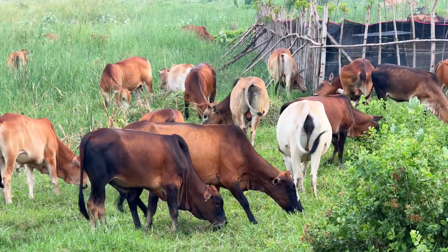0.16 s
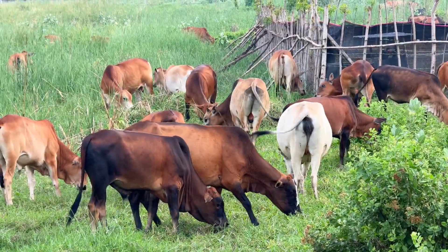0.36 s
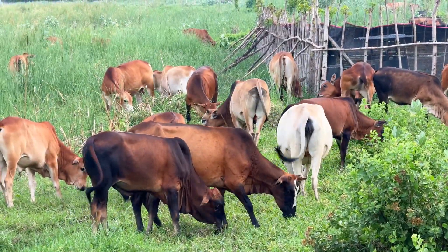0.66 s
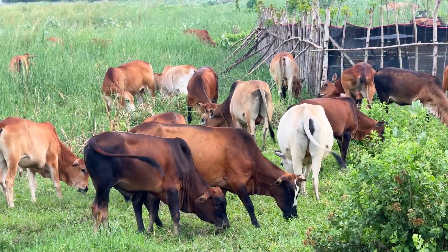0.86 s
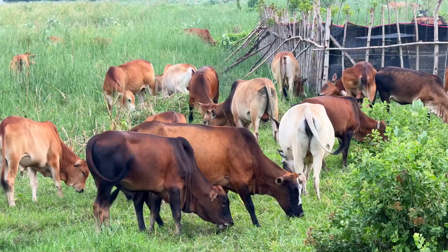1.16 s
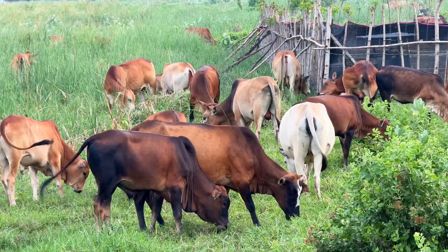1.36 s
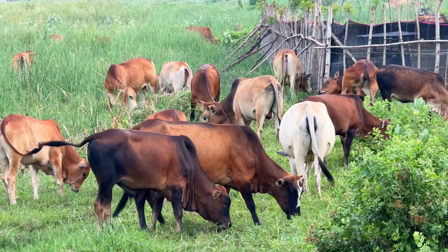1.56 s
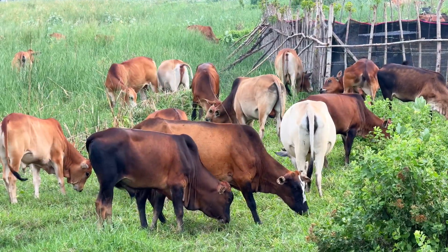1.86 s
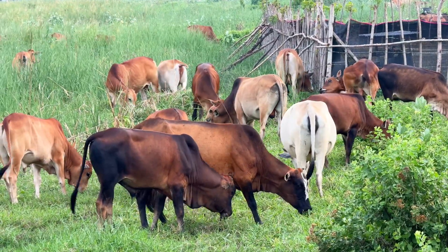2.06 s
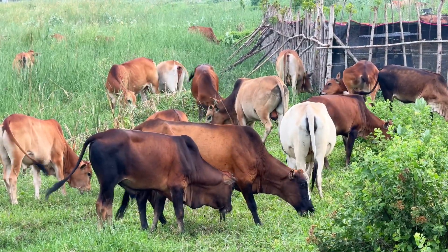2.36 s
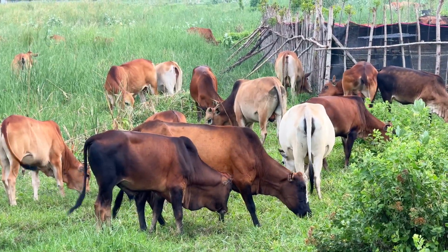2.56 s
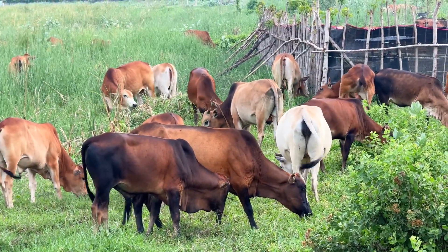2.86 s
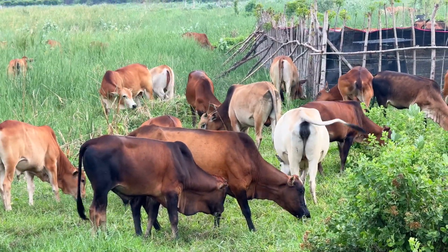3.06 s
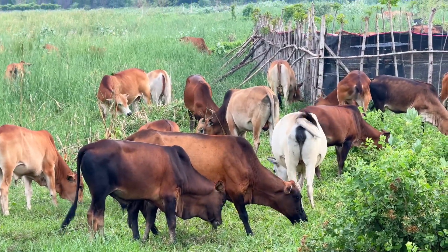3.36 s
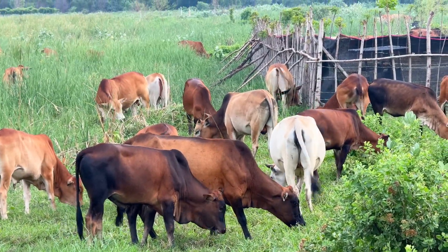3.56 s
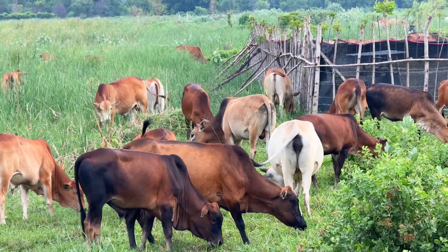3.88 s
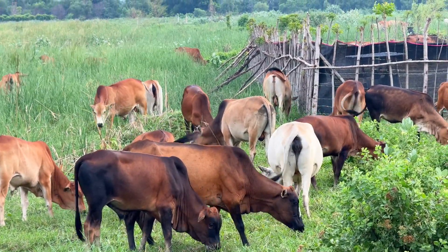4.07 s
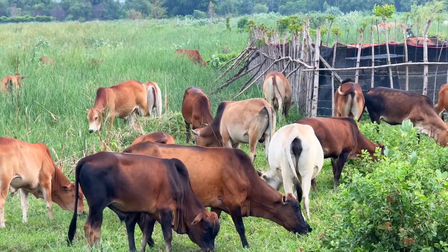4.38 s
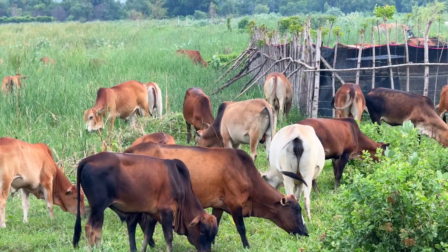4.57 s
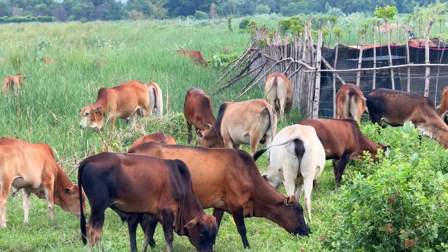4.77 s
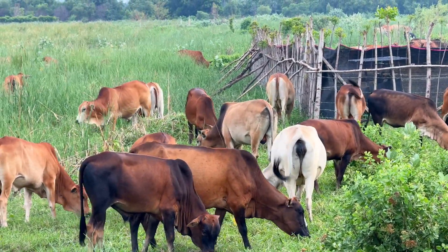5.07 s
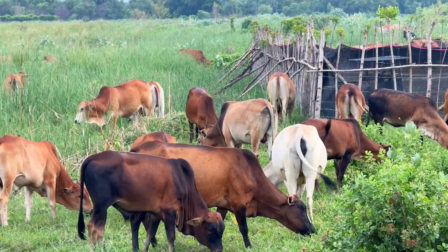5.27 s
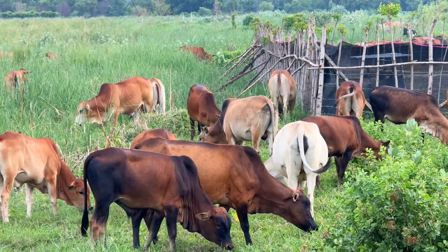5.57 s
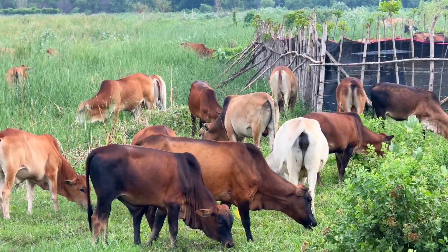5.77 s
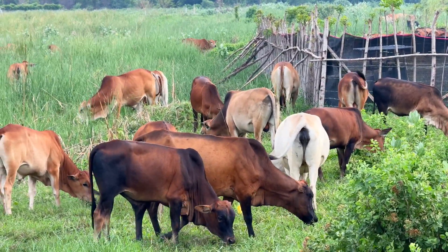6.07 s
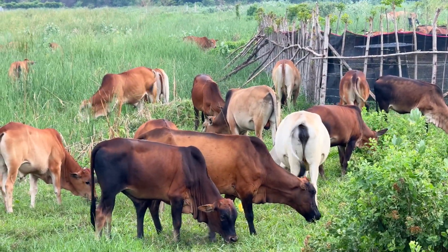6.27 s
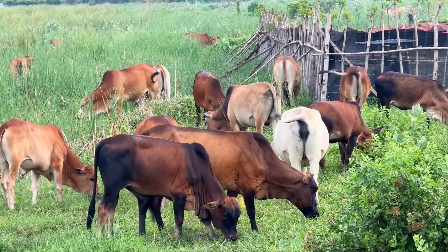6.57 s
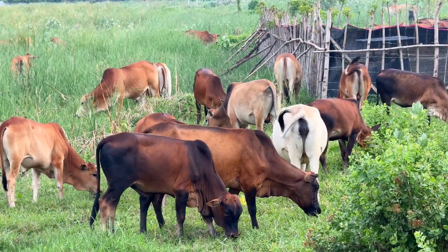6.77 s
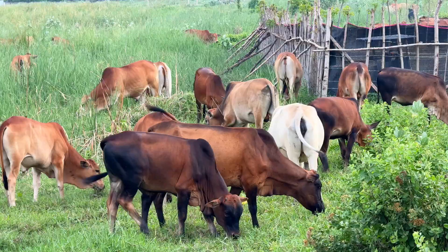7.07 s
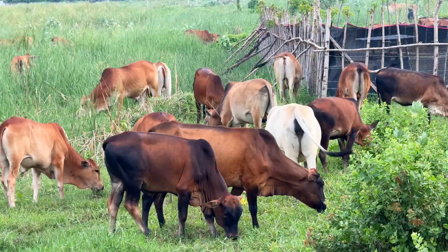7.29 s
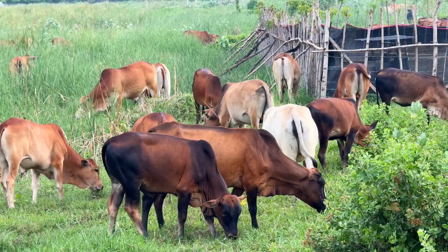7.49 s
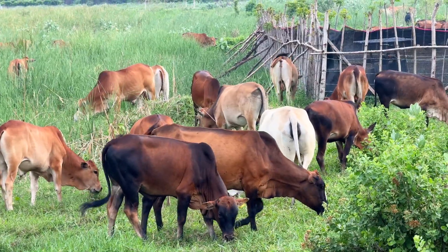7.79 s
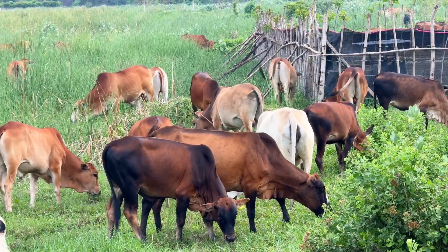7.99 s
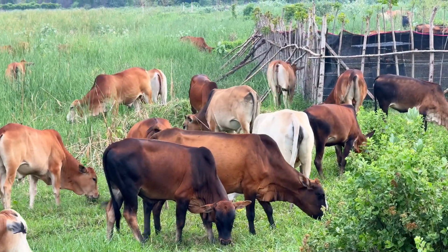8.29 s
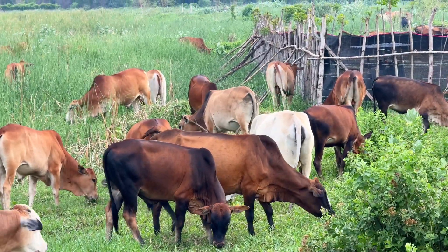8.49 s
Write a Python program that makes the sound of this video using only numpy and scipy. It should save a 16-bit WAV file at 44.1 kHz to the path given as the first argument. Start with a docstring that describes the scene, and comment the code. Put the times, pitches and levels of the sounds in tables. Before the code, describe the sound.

Small birds whistle, chirp and trill in a breezy cattle pasture, slightly to the right, with a light echo. Low wind rumbles and thumps on the right side of the microphone at first, then gusts hit both sides in short popping puffs. The song grows loudest in the middle and thins out as the thumps return near the end. Grass stems snap now and then over a faint rustle of leaves.

```python
"""Small birds whistle and trill over wind that rumbles and thumps in the right microphone port.
The stereo microphone stands in a breezy cattle pasture. The song, near-sine whistles gliding in
pitch, comes mostly from the right, and the hedges echo it. Gusts buffet both ports in short
popping puffs, grass stems snap now and then, and far grass and leaves rustle behind it all."""
import sys
import numpy as np
from scipy import signal
from scipy.fft import rfft, irfft
from scipy.io import wavfile
from scipy.ndimage import uniform_filter1d

SR = 44100
rng = np.random.default_rng(int(sys.argv[2]) if len(sys.argv) > 2 else 0)


def bounce(signal):
    """Save signal as a 16-bit WAV file at the path given by the first command-line argument."""
    frames = np.transpose(np.atleast_2d(signal))
    limited = np.clip(frames, -1, 1)
    pcm = np.round(limited * 32767).astype(np.int16)
    wavfile.write(sys.argv[1], SR, pcm)


N = 381024

# Levels are relative within each table; pan is left minus right.
# far grass and leaves: f/Hz, level/dB
RUSTLE_SPECTRUM = [(120, -29), (200, -18.5), (755, -11.5), (1400, -20), (8350, -24.5), (9310, -30.5),
                   (10800, -23.5), (14200, -28.5), (15500, -23)]
# grass stems breaking: t/s, level/dB, pan/dB
STEM_SNAPS = [(0.966, -38.5, 0), (1.3882, -37, 2), (1.9706, -37, -2), (2.681, -31.5, 0),
              (2.722, -17.5, 8.5), (2.91, -35, 11), (4.959, -22.5, 8.5), (5.948, -26, 5.5),
              (6.8535, -38.5, 0), (7.647, -39, -4)]
# resonances of a snap: f/Hz, width/Hz, level/dB
STEM_MODES = [(3170, 290, -1.5), (5650, 650, -4), (8440, 1200, -2), (10180, 230, 0.5), (11640, 430, -4),
              (13740, 1300, -5.5)]
# bursts of wind in the right port: t/s, hold/s, level/dB
RUMBLE_BURSTS = [(.22, 0.13, -25.5), (.48, 0.12, -28), (.87, 0.054, -35.5), (1.08, 0.043, -28),
                 (1.24, 0.13, -38.5), (2.4, 0.0066, -37), (3.25, 0.22, -39.5), (4.21, 0.032, -30.5),
                 (5.5, 0.0094, -23), (6.82, 0.013, -28.5), (7.62, 0.18, -28.5), (7.86, 0.1, -39.5),
                 (8.14, 0.097, -42.5)]
# turbulence in the port: f/Hz, level/dB
RUMBLE_SPECTRUM = [(15, -2.5), (43, 5), (90, -6), (120, -9), (190, -42.5), (400, -91)]
# single thumps of wind on the right port: t/s, level/dB, f/Hz
PORT_THUMPS = [(0.218, -6.5, 63.6), (0.248, -9.5, 93), (0.285, -9.5, 64.5), (0.34, -7, 62),
               (.475, -5, 55.7), (.56, -13, 60.6), (0.65, -10, 63.4), (.883, -16, 42.5), (1.074, -5, 91),
               (1.117, -14, 71), (1.521, -4.5, 59), (4.236, -4.5, 84.4), (4.865, -11, 61),
               (5.376, -8.5, 62), (5.518, -9.5, 74), (5.795, -16.5, 58.6), (6.038, -15, 55),
               (6.767, -17, 39.5), (7.642, -2.5, 95.4), (7.719, -6, 105), (7.747, -3.5, 90),
               (7.795, -13, 59.3)]
# gusts across both ports: t/s, hold/s, level/dB, brightness/dB
PORT_GUSTS = [(1.948, 0.096, -45, -9.5), (2.231, 0.18, -36.5, -3.5), (2.653, 0.39, -35.5, 0),
              (3.191, 0.059, -29, -5), (3.346, 0.26, -38.5, -11.5), (3.714, 0.011, -35, -6),
              (3.913, 0.0026, -31.5, -15), (4.179, 0.017, -27, -20), (4.395, .2, -38.5, -18.5),
              (5.109, 0.17, -36.5, -1), (5.43, 0.027, -36, -1), (5.638, 0.066, -37, -3.5),
              (5.787, 0.14, -34, 0), (6.113, 0.18, -40.5, -4), (6.457, .12, -38.5, -13),
              (6.706, 0.0083, -35, 3.5), (7.127, 0.28, -32.5, -7), (7.475, 0.2, -43.5, -9),
              (7.852, 0.091, -49.5, 2), (8.35, .15, -47, -8), (8.604, .04, -38.5, 3.5)]
# the dull part of a gust: f/Hz, level/dB
DULL_GUST_SPECTRUM = [(30, -11), (90, 2.5), (300, -12), (800, -27), (1500, -80.5)]
# the bright part of a gust: f/Hz, level/dB
BRIGHT_GUST_SPECTRUM = [(100, -5.5), (300, -4.5), (750, -8), (1400, -23), (1900, -35.5), (2600, -71)]
# the hardest buffets on the microphone: t/s, level/dB
HARD_PUFFS = [(2.234, -26.5), (2.323, -31), (2.458, -16.5), (2.464, -18.5), (2.47, -16.5), (2.587, -24.5),
              (2.635, -24.5), (2.681, -23.5), (2.689, -18.5), (2.804, -26), (2.861, -23), (2.914, -23.5),
              (2.968, -25), (3.045, -22.5), (3.117, -25), (3.162, -27), (3.172, -25.5), (3.181, -21),
              (3.19, -19.5), (3.235, -22), (3.721, -24.5), (4.209, -28.5), (5.102, -30), (5.173, -20),
              (5.401, -20), (5.418, -23.5), (5.434, -25), (5.692, -29), (5.773, -22.5), (5.856, -30),
              (5.924, -21.5), (6.578, -28.5), (6.676, -26.5), (6.735, -26.5), (7.156, -23.5),
              (7.271, -25.5), (7.315, -29.5), (7.338, -22), (7.423, -31.5), (8.554, -27), (8.631, -17.5)]
# further whistles, held at one pitch: t/s, length/s, f/Hz, level/dB
FLAT_PEEPS = [(0, 0.034, 5240, -47.5), (.85, 0.015, 2690, -50), (1.536, 0.021, 2400, -41),
              (1.606, 0.025, 7100, -48), (2.225, 0.035, 5720, -37.5), (2.398, 0.016, 2590, -42.5),
              (2.588, 0.19, 2750, -39), (3.134, 0.02, 2044, -49), (3.373, .026, 2760, -40.5),
              (4.058, 0.023, 2610, -38), (4.276, .18, 2640, -39.5), (5.537, 0.019, 3027, -27.5),
              (6.053, 0.068, 7410, -45), (6.315, 0.021, 1880, -50), (6.394, 0.087, 2632, -46),
              (6.553, 0.027, 5010, -41.5), (6.754, 0.022, 2940, -37), (6.803, 0.024, 2553, -41.5),
              (6.935, 0.015, 6500, -40.5), (7.842, 0.019, 5110, -48.5)]
# whistles, turning where loudest: t/s, rise/s, fall/s, first f/Hz, turn f/Hz, last f/Hz, level/dB
WHISTLES = [ (0.014, 0.021, 0.05, 6300, 5800, 5520, -44.5), (.115, 0.0067, 0.044, 6180, 5920, 5690, -37),
            (0.226, 0.012, 0.028, 6400, 5870, 5700, -34.5), (0.328, 0.017, 0.037, 6010, 5810, 5400, -38),
            (1.03, 0.017, 0.047, 3130, 2920, 2730, -43), (1.154, 0.028, 0.026, 2970, 2797, 2830, -28),
            (1.198, 0.011, 0.039, 2950, 3056, 3260, -28), (1.244, 0.013, 0.017, 3300, 3430, 4000, -34),
            (1.351, 0.0067, 0.018, 2820, 2800, 2690, -31), (1.373, 0.013, 0.051, 2740, 3150, 3420, -27),
            (1.445, 0.005, 0.011, 4200, 4440, 4900, -36.5), (1.563, 0.015, 0.014, 2744, 3190, 2670, -28.5),
            (1.679, 0.0083, 0.017, 2720, 3064, 2710, -34), (1.8, 0.053, 0.022, 2860, 2690, 2735, -37),
            (2.268, 0.018, 0.0065, 4180, 4320, 3880, -32.5), (2.296, 0.02, 0.031, 4040, 4823, 4774, -25),
            (2.455, 0.019, 0.039, 6580, 6100, 5390, -28), (2.494, 0.027, 0.027, 4450, 4400, 3850, -24.5),
            (2.53, 0.01, .008, 4180, 4910, 3820, -19), (2.549, 0.019, 0.014, 3830, 5070, 4870, -21),
            (2.725, 0.018, 0.004, 3180, 3820, 4260, -15.5), (2.774, 0.0053, 0.026, 2830, 2720, 2640, -26.5),
            (2.939, 0.014, 0.033, 8160, 7690, 6660, -31), (2.899, 0.035, 0.0046, 3030, 3706, 4216, -16.5),
            (2.969, 0.01, 0.016, 2560, 2700, 2500, -24.5), (3.102, .012, 0.0095, 5410, 5640, 5200, -24.5),
            (3.112, 0.032, 0.051, 4750, 3907, 4130, -17), (3.228, 0.011, 0.014, 5320, 5620, 5240, -21),
            (3.243, .045, 0.016, 4720, 4014, 4140, -17), (3.39, 0.012, 0.024, 3860, 3500, 2754, -23),
            (3.425, 0.027, 0.017, 2840, 3272, 2840, -20), (3.462, 0.12, 0.087, 8500, 8390, 8230, -29.5),
            (3.532, .025, 0.013, 3730, 2805, 2920, -22), (3.574, 0.023, 0.018, 2990, 3224, 2664, -16.5),
            (3.711, 0.05, 0.0068, 8930, 8770, 8870, -39), (3.693, 0.028, 0.014, 5470, 5500, 4750, -19),
            (3.759, 0.0042, 0.0065, 5470, 6040, 6980, -31),
            (3.945, 0.0099, 0.0032, 3430, 3960, 3970, -27.5), (3.967, 0.024, 0.0029, 3350, 3720, 4000, -16),
            (3.987, 0.054, 0.014, 4690, 4266, 4380, -14), (4.038, 0.032, 0.13, 4210, 4596, 4190, -18.5),
            (4.183, 0.014, 0.0046, 3320, 4030, 4160, -23), (4.199, 0.017, 0.012, 3300, 3684, 3690, -16.5),
            (4.243, 0.016, .012, 6430, 5720, 5200, -18.5), (4.244, 0.025, 0.036, 4880, 4727, 4570, -13),
            (4.692, 0.018, .018, 3130, 4120, 3600, -17), (4.722, 0.013, 0.015, 3250, 3560, 3800, -16),
            (4.966, .03, 0.046, 4820, 4390, 4200, -18.5), (5.03, 0.007, 0.082, 4960, 4930, 5140, -23.5),
            (5.084, 0.036, 0.014, 3014, 3132, 2920, -30), (5.147, 0.011, 0.0063, 4010, 3756, 2970, -16),
            (5.378, 0.022, 0.083, 4640, 4240, 4194, -24.5), (5.575, 0.0076, 0.023, 3720, 3970, 2874, -20),
            (5.817, 0.038, 0.021, 4460, 4224, 3990, -22), (6.041, 0.028, 0.044, 6240, 6500, 6620, -40),
            (6.392, 0.037, 0.028, 3460, 3792, 3640, -34), (6.569, 0.027, .015, 6470, 5430, 5580, -34.5),
            (6.59, 0.033, 0.0061, 4545, 4490, 4500, -31.5), (6.69, 0.03, 0.01, 3540, 3460, 3220, -39),
            (6.733, 0.0081, .018, 4150, 4340, 3770, -30), (6.775, 0.012, 0.015, 3800, 3800, 3550, -29),
            (6.93, 0.024, .005, 4830, 5040, 4850, -40), (6.959, 0.013, 0.027, 5990, 5500, 5320, -36.5),
            (6.979, 0.032, 0.011, 4440, 4490, 4400, -33.5), (7.205, 0.022, 0.012, 3590, 3806, 3920, -29),
            (7.462, 0.024, 0.017, 3110, 3420, 3384, -35), (7.769, 0.039, 0.017, 2490, 2717, 3160, -35.5),
            (7.82, 0.026, 0.3, 3200, 3178, 3104, -35.5), (8.1, 0.011, 0.04, 3070, 3115, 2605, -38), ]
# buzzy trills: t/s, rise/s, fall/s, first f/Hz, turn f/Hz, last f/Hz, level/dB, pitch swing/Hz
BUZZY_TRILLS = [(.42, 0.04, 0.026, 4690, 4115, 3570, -31.5, 255),
                (.46, 0.04, 0.06, 4010, 4600, 4470, -33, 234),
                (.58, 0.036, 0.017, 5010, 3840, 3720, -32.5, 258),
                (.63, 0.056, 0.0093, 4690, 4450, 4600, -36, 243),
                (.75, 0.05, 0.058, 3540, 4110, 3540, -31.5, 250),
                (.86, 0.014, 0.05, 4240, 3640, 3860, -29.5, 238),
                (.97, 0.014, 0.043, 3650, 3820, 4330, -31.5, 251),
                (1.03, 0.045, 0.011, 4380, 3703, 3600, -28, 254),
                (3.12, 0.11, 0.089, 3495, 3587, 3430, -32, 231),
                (3.3, 0.036, 0.11, 4870, 4570, 4400, -25, 433),
                (4.29, 0.021, 0.097, 5200, 5210, 5550, -19, 455),
                (4.4, 0.089, 0.11, 5540, 5196, 5260, -26, 419),
                (4.76, 0.038, 0.26, 3750, 3880, 3700, -26, 439),
                (4.11, 0.035, 0.11, 5580, 5290, 5300, -30, 150),
                (5.125, 0.024, 0.02, 5680, 5330, 5540, -25.5, 250),
                (7.105, 0.036, 0.013, 3410, 3055, 2600, -35, 246),
                (7.36, 0.026, 0.023, 3730, 3480, 2780, -38, 250),
                (4.39, 0.026, 0.024, 7120, 7130, 6840, -39.5, 244),
                (4.75, 0.021, 0.032, 5260, 5090, 5230, -36.5, 252),
                (4.88, 0.052, 0.036, 4490, 5360, 5730, -27, 440),
                (5.03, 0.026, 0.03, 5880, 5560, 5600, -31.5, 458),
                (5.285, 0.044, 0.024, 4570, 5440, 5240, -25.5, 476),
                (5.72, 0.057, 0.034, 4840, 5110, 5340, -28, 423)]
# where the song comes from, seen from the microphone: t/s, pan/dB
SONG_PAN = [(0, -7.5), (1.5, -3.5), (3, -0.5), (5.5, -1.5), (6.6, -5.5), (7.4, -4), (7.9, 0), (8.64, 1)]
# song arriving straight, low when the singers are far or behind leaves: t/s, level/dB
DIRECT_SONG = [(0, 9), (.4, -1), (1.2, 0), (2.7, 5.5), (4.3, -3.5), (5.1, 2), (6.5, 6), (8.64, 6)]


def gain_of(db):
    return 10 ** (np.asarray(db) / 20)


def unit_rms(x):
    return x / np.sqrt(np.mean(x ** 2) + 1e-20)


def curve(rows):
    return np.interp(np.arange(N) / SR, *np.transpose(rows))


def band(x, low_hz, high_hz):
    return signal.sosfilt(signal.butter(3, [low_hz, high_hz], "band", fs=SR, output="sos"), x)


def coloured(spectrum, drive=1):
    """Noise shaped in time by drive, then filtered to a spectrum of f/Hz, level/dB points."""
    hz, db = np.transpose(spectrum)
    shape = gain_of(np.interp(np.log(np.fft.rfftfreq(N, 1 / SR) + 1), np.log(hz), db))
    return irfft(rfft(rng.standard_normal(N) * drive) * unit_rms(shape), N)


def wander(top_hz, count=N):
    """Slow random drift of rms 1."""
    lowpass = signal.butter(2, top_hz, fs=SR, output="sos")
    return unit_rms(signal.sosfilt(lowpass, rng.standard_normal(count)))


def sides(pan_db):
    return gain_of(np.reshape([pan_db / 2, -pan_db / 2], (2, -1)))


def add(mix, start, sound):
    part = mix[:, round(start * SR):][:, :sound.shape[1]]
    part += sound[:, :part.shape[1]]


def impulses(per_s, spread_db):
    """Clicks of uneven strength at random times."""
    return (rng.random(N) < per_s / SR) * gain_of(spread_db * rng.exponential(1, N).clip(0, 2))


def wind_envelope(bursts, rise_db_per_s, fall_db_per_s, calm_db):
    """Gain of the wind: each burst climbs out of the calm, holds and dies away."""
    t, level_db = np.arange(N) / SR, calm_db
    for start, hold, db, *_ in bursts:
        before, after = np.maximum(start - t, 0), np.maximum(t - start - hold, 0)
        level_db = np.maximum(level_db, db - rise_db_per_s * before - fall_db_per_s * after)
    return gain_of(level_db)


def far_rustle():
    """Grass and leaves rustle softly far across the field, with tiny ticks of blades breaking."""
    swell = gain_of(-61.7 + 1.3 * wander(3) + .6 * wander(60))
    breaks = impulses(per_s=9, spread_db=4)
    ticks = 1 + .8 * signal.oaconvolve(breaks, np.exp(-np.arange(400) / (.002 * SR)))[:N]
    shared, left, right = (coloured(RUSTLE_SPECTRUM) for _ in range(3))
    return (.77 * shared + np.array([left, right])) * swell * ticks


def hedge_echoes(sound, near_s=.0052, far_s=.17, drift_hz=6):
    """Near leaves scatter the sound first, then hedges further out; beyond them the field is open."""
    t, out = np.arange(SR // 2) / SR, np.zeros((2, N))
    leaves = .16 * np.exp(-t / near_s)
    hedges = (1 - np.exp(-t / .0096)) * np.exp(-t / .052 - (t / far_s) ** 2 / 2)
    for k in range(3):  # three echo patterns crossfade as branches and animals move
        taps = rng.standard_normal((2, len(t))) * (leaves + hedges) * (t > .002)
        share = np.sqrt(2 / 3) * np.cos(2 * np.pi * (drift_hz * np.arange(N) / SR + k / 3))
        out += signal.oaconvolve(sound * share, taps / np.linalg.norm(taps[0]), axes=1)[:, :N]
    return out


def stem_snaps():
    """Grass stems tick as they break; louder snaps swell in briefly and ring at their own pitches."""
    out, t = np.zeros((2, N)), np.arange(3200) / SR - .03
    swell = np.exp(-(t / .006) ** 2) + np.where(t < 0, .25 * np.exp(t / .015), .15 * np.exp(-t / .009))
    breaking = np.exp(-abs(t) / .0012) * (t > 0)
    for start, db, pan_db in STEM_SNAPS:
        crack, tuning = rng.standard_normal((2, len(t))), rng.uniform(.88, 1.02)
        ring = sum(gain_of(mode_db) * band(crack * swell, *(tuning * hz + np.r_[-width, width] / 2))
                   for hz, width, mode_db in STEM_MODES)
        tick = band(crack * breaking, 3500, 15000)
        ring_share = np.clip((db + 40) / 15, 0, 1)
        snap = ring_share * unit_rms(ring) + (1 - ring_share) * unit_rms(tick)
        add(out, start + t[0], sides(pan_db) * gain_of(db) * snap / abs(snap).max())
    return out


def port_rumble(thump_cycles=.79):
    """Wind right at the microphone: lumpy low turbulence and thumps, almost all in the right port."""
    lumps = gain_of(3.5 * np.tanh(wander(12)))
    ports = np.array([gain_of(db) * coloured(RUMBLE_SPECTRUM) for db in (-16.5, 10.5)])
    ports *= lumps * wind_envelope(RUMBLE_BURSTS, rise_db_per_s=160, fall_db_per_s=108, calm_db=-60.5)
    t = np.arange(-.06, .06, 1 / SR)
    for centre, db, hz in PORT_THUMPS:
        push = np.cos(2 * np.pi * hz * t) * np.exp(-(hz * t / thump_cycles) ** 2)
        add(ports[1:], centre + t[0], gain_of(db) * push[None])
    return ports


def port_buffeting():
    """Gusts hit both ports in lumps of noise: small random eddies under the hard puffs."""
    kicks = np.zeros(N)
    for start, db in HARD_PUFFS:
        kicks[round(start * SR)] = gain_of(db)
    puffs = signal.oaconvolve(kicks, signal.windows.tukey(round(.0087 * SR), .6))[:N]
    eddies = impulses(per_s=40, spread_db=2.66)
    lumps = .3 + .8 * signal.oaconvolve(eddies, np.hanning(round(.011 * SR)))[:N]
    wind = wind_envelope(PORT_GUSTS, rise_db_per_s=163, fall_db_per_s=121, calm_db=-57.5)
    gust = abs(lumps) * wind * gain_of(38.5) + abs(puffs) * gain_of(14)
    brightness = gain_of(curve([(start, bright_db) for start, _, _, bright_db in PORT_GUSTS]))
    dull = gain_of(-34) * gust ** .8
    bright = gain_of(-40) * brightness * gust ** 1.25  # grows faster than the gust
    out = np.zeros((2, N))
    for spectrum, drive, left_gain, right_gain in [(DULL_GUST_SPECTRUM, dull, .45, .4),
                                                   (BRIGHT_GUST_SPECTRUM, bright, .7, .3)]:
        shared, left, right = (coloured(spectrum, drive) for _ in range(3))
        out += shared + np.array([left_gain * left, right_gain * right])
    return out


def port_pops(first_hz=1314, last_hz=247, sag_s=.002282, decay_s=.0024):
    """Each hard puff pops on the microphone: a few cycles of falling pitch, never twice the same."""
    out, t = np.zeros((2, N)), np.arange(round(.02 * SR)) / SR
    sweep_hz = last_hz + (first_hz - last_hz) * np.exp(-t / sag_s)
    for start, db in HARD_PUFFS:
        detune, stretch, phase, pan = rng.uniform(-1.01, 1, 4)
        hz = (1 + .2 * detune) * sweep_hz
        age = t / (decay_s * (1 + .3 * stretch))
        pop = age * np.exp(1 - age) * np.sin(2 * np.pi * np.cumsum(hz) / SR + np.pi * phase)
        add(out, start - .001, sides(1 + 2 * pan) * gain_of(db - 4) * pop)
    return np.array([np.roll(out[0], 7), out[1]])  # the air reaches the left port later


def birdsong(trill_hz=87, wobble_hz=15, swell_db=11, fade_db=12.5, onset_s=.012, onset_db=24):
    """Birds in the hedges whistle near-sines with an unsteady throat; a trill shakes the pitch fast."""
    song = np.zeros((1, N))
    whistles = [(*row, 0) for row in WHISTLES]
    peeps = [(start, length / 2, length / 2, hz, hz, hz, db, 0) for start, length, hz, db in FLAT_PEEPS]
    for start, rise, fall, *hz, db, swing_hz in [*whistles, *peeps, *BUZZY_TRILLS]:
        _, turn, end = corners = start + np.cumsum([0, rise, fall])
        t = np.arange(max(start - onset_s, 0), end + .0065, 1 / SR)
        shake = np.sin(2 * np.pi * (trill_hz * t + .243 * wander(60, len(t))))
        glide = uniform_filter1d(np.interp(t, corners, hz), 160, mode="nearest")  # rounds each turn
        pitch = glide + swing_hz * shake + wobble_hz * wander(120, len(t))
        drop_db = np.where(t < turn, swell_db, fade_db) * np.interp(t, corners, [1, 0, 1]) ** 1.16
        drop_db += onset_db * np.maximum(start - t, 0) / onset_s  # fades in with a short, soft onset
        level = gain_of(db - drop_db + 2 * wander(70, len(t)))
        taper_s = .05 if swing_hz else .008  # trills swell in
        edges = signal.windows.tukey(len(t), min(taper_s * SR / len(t), 1))
        add(song, t[0], np.sqrt(2) * level * edges * np.sin(2 * np.pi * np.cumsum(pitch) / SR)[None])
    left = np.roll(song[0], 3)  # the birds sit to the right, so the left port hears them late
    return np.array([left, song[0]]) * sides(curve(SONG_PAN))


def scene():
    """The pasture from the microphone: song and snaps with their echoes, wind, far rustle."""
    song, stems = birdsong(), stem_snaps()
    echoes = hedge_echoes(gain_of(-.5) * song + gain_of(-10.5) * stems)
    wind = port_rumble() + port_buffeting() + port_pops()
    return gain_of(curve(DIRECT_SONG)) * song + stems + echoes + wind + far_rustle()


def record(dry):
    """The recorder's band ends at 15.7 kHz."""
    lowpass = signal.firwin(511, 15700, window=("kaiser", 9), fs=SR)
    return signal.oaconvolve(dry, lowpass[None], "same")


dry = scene()
out = record(dry)
bounce(out)
```